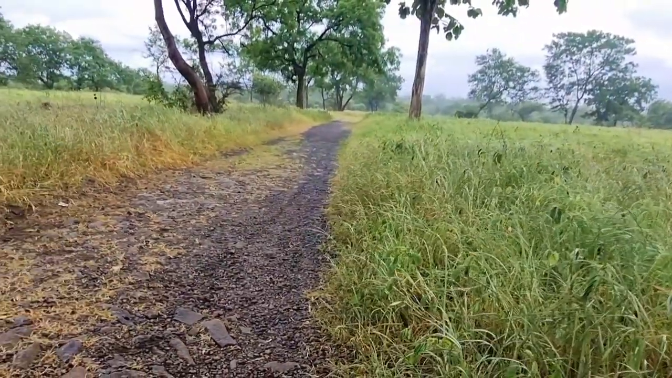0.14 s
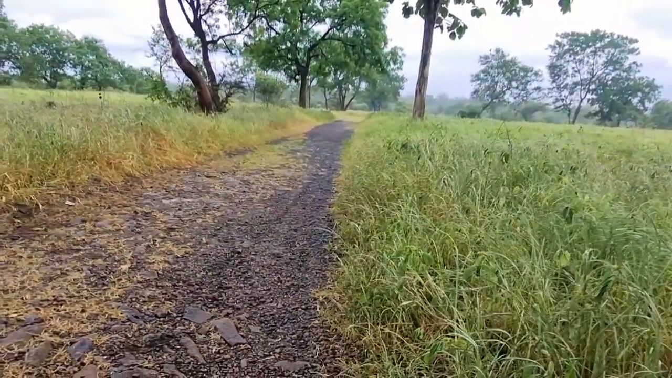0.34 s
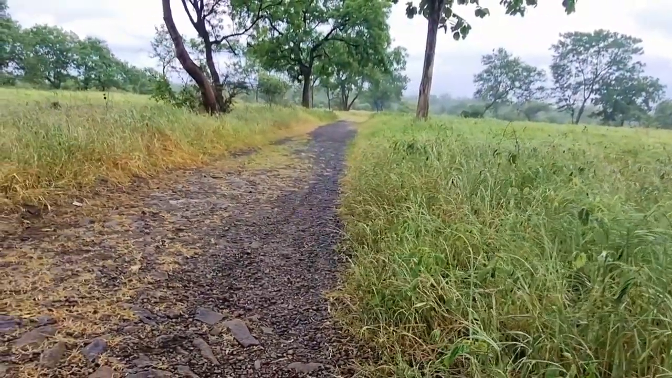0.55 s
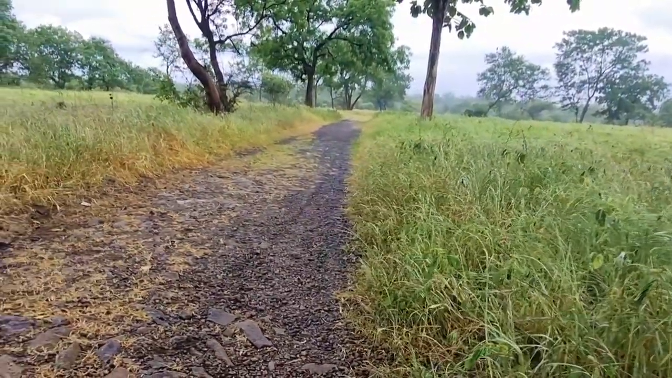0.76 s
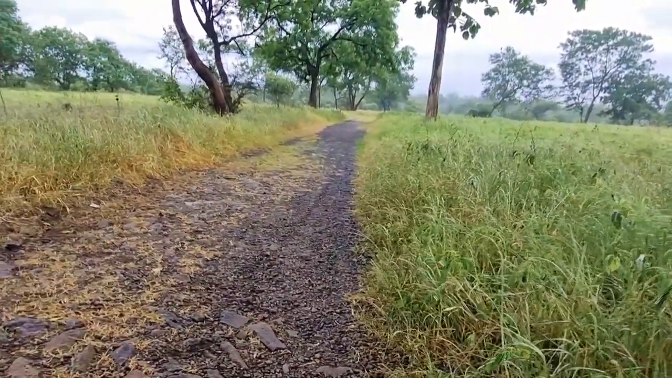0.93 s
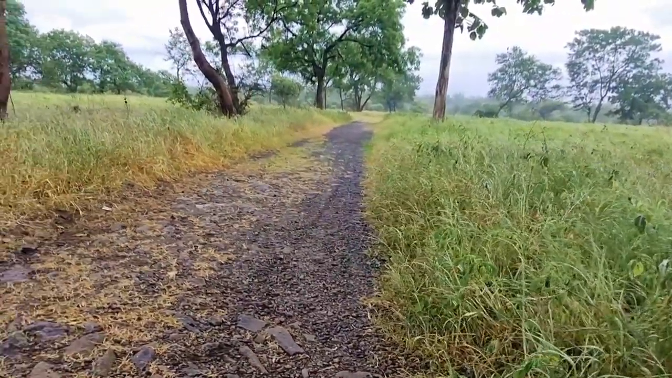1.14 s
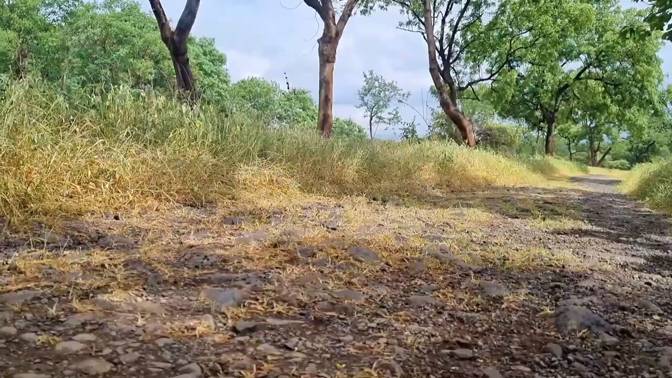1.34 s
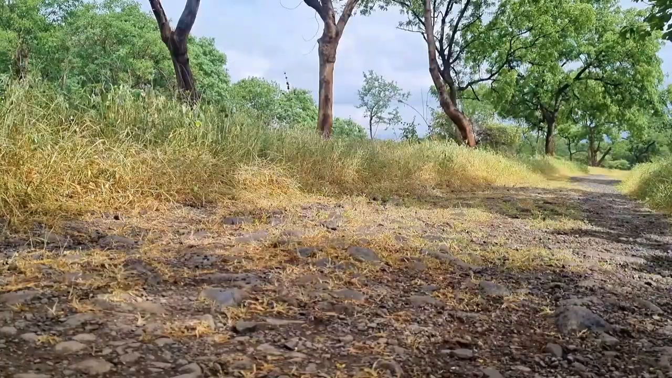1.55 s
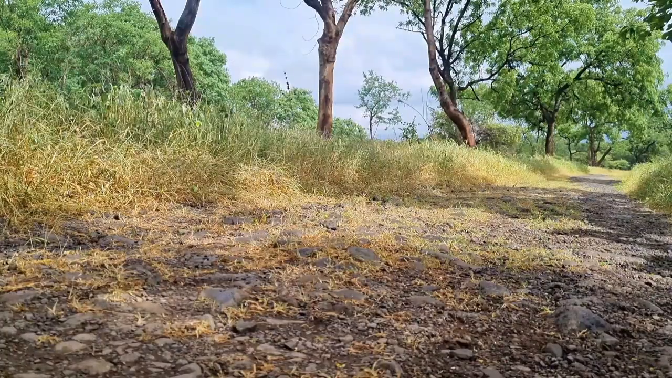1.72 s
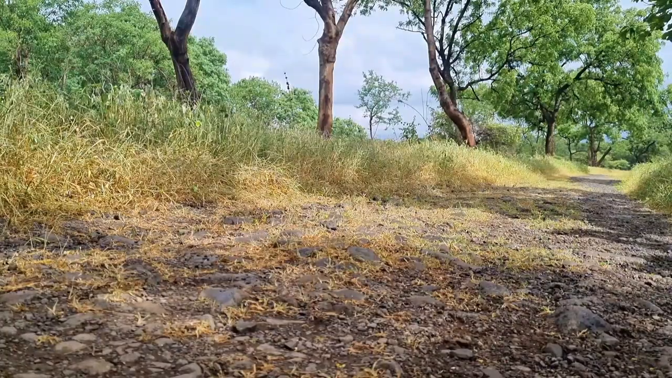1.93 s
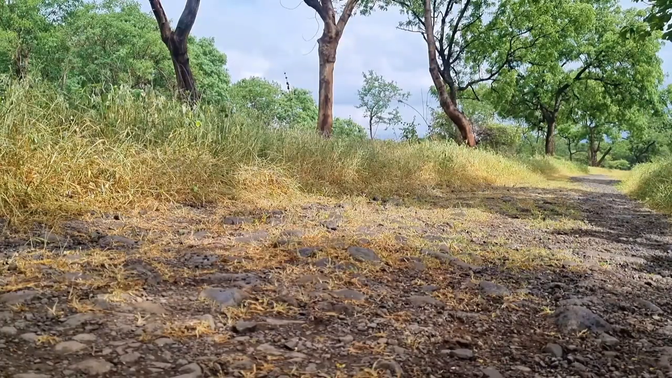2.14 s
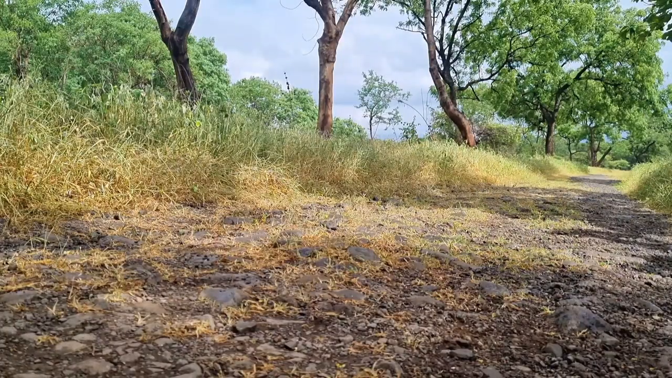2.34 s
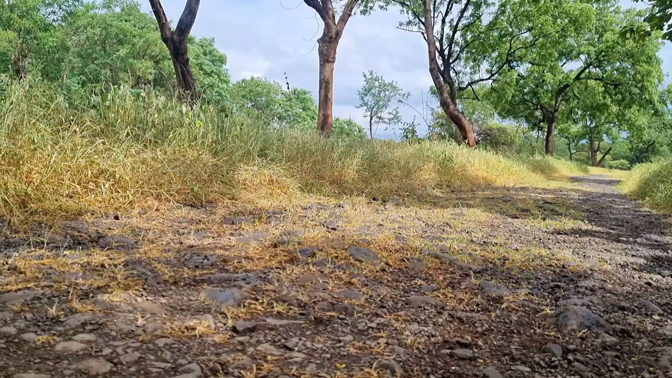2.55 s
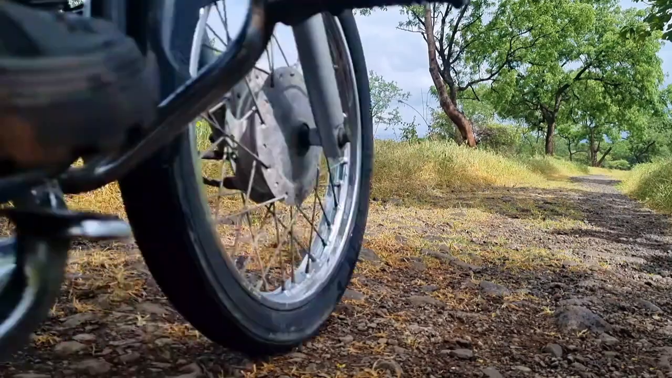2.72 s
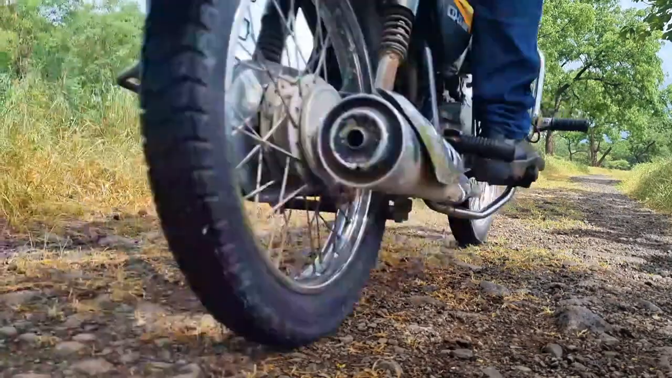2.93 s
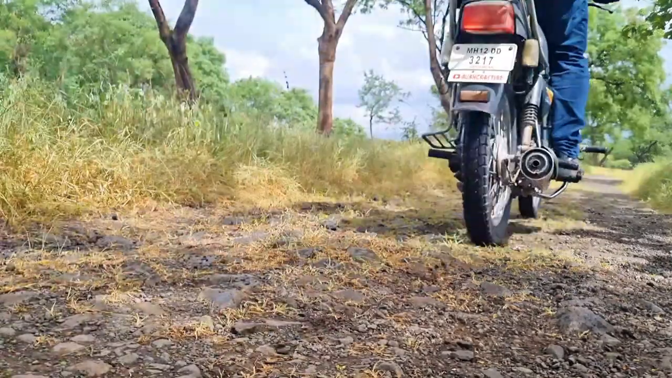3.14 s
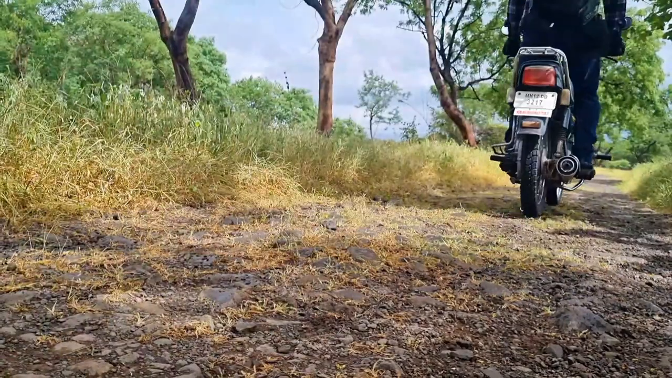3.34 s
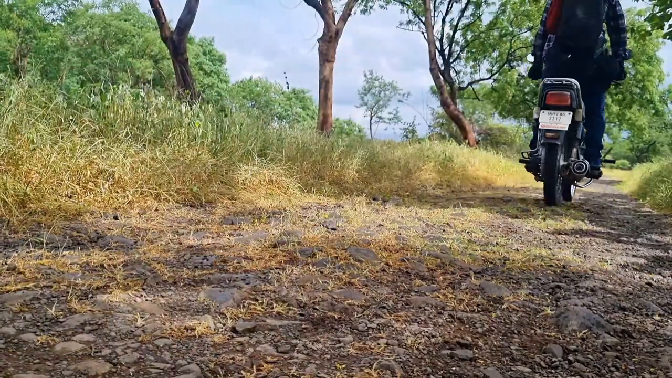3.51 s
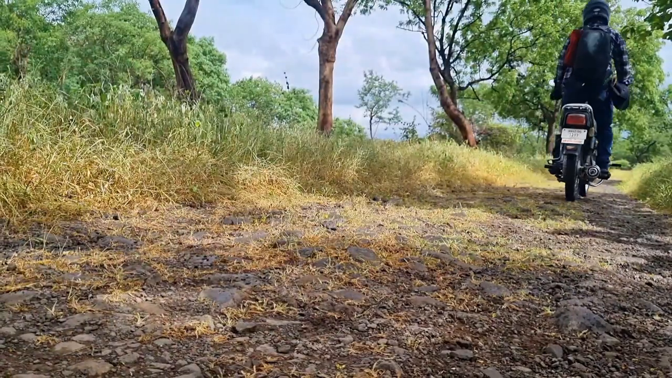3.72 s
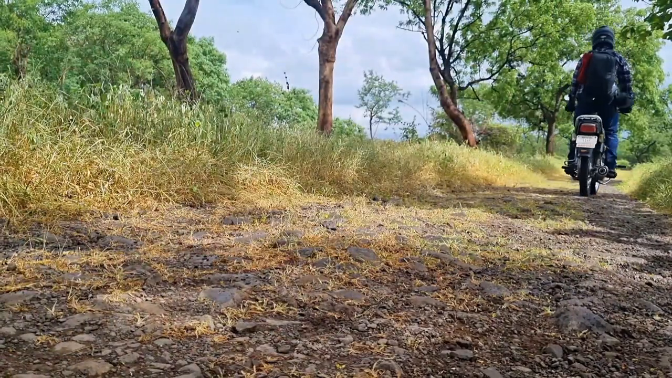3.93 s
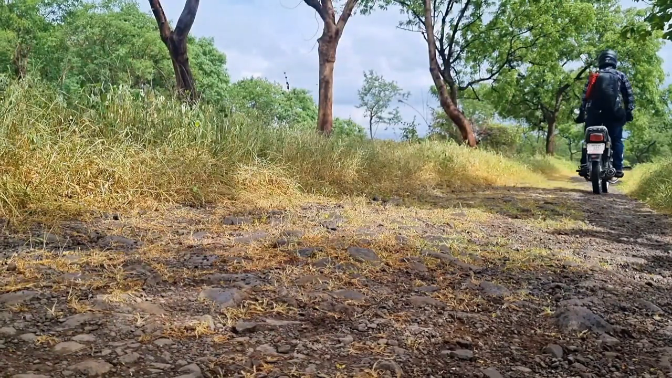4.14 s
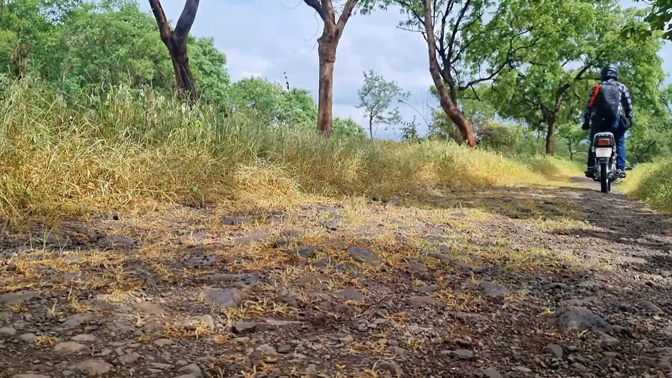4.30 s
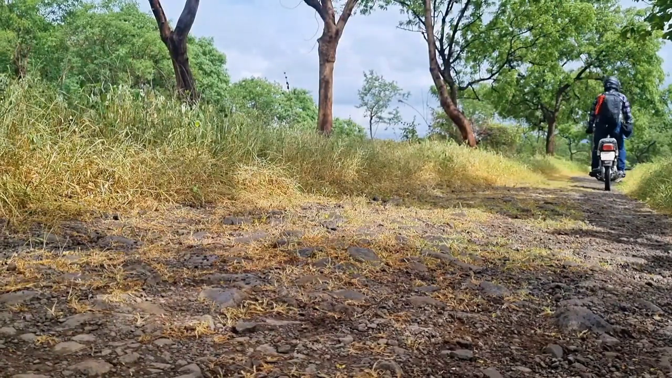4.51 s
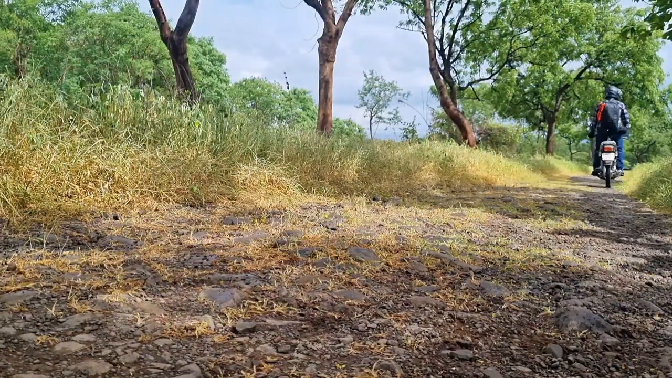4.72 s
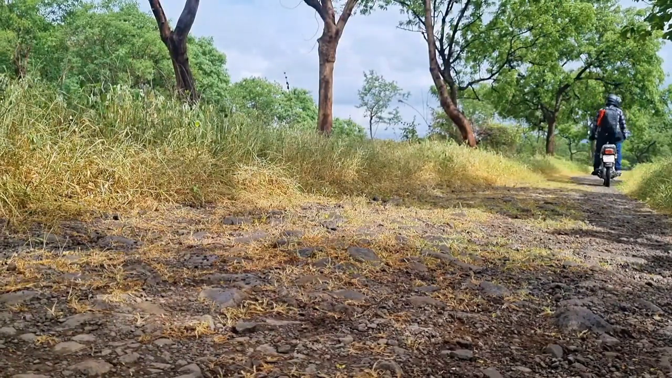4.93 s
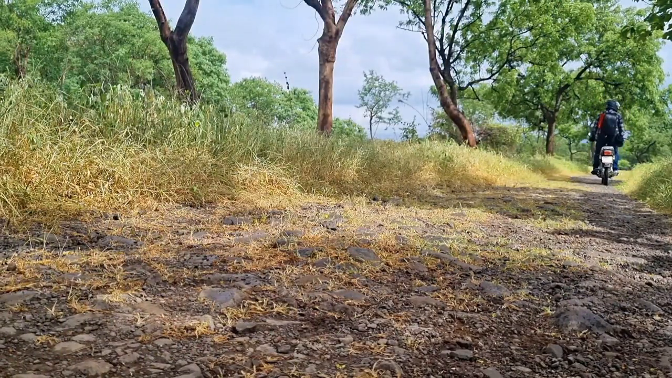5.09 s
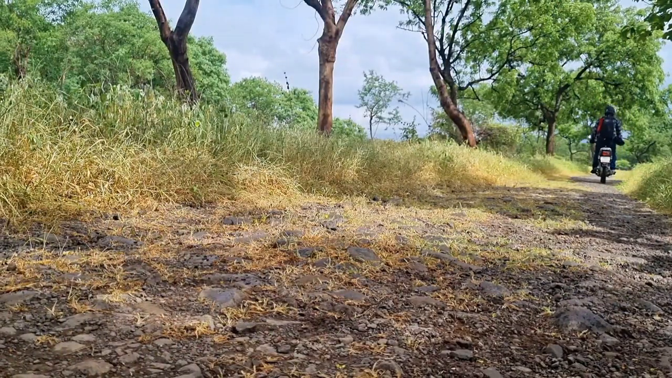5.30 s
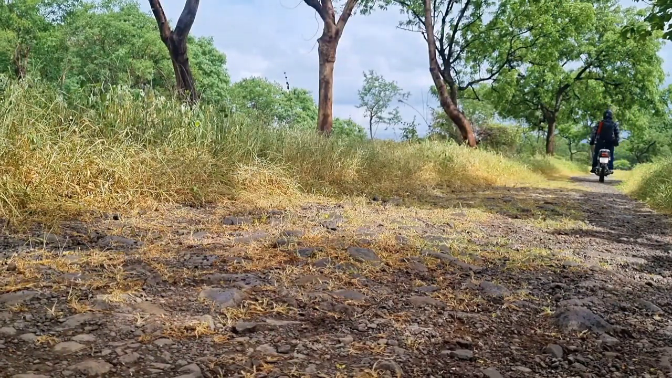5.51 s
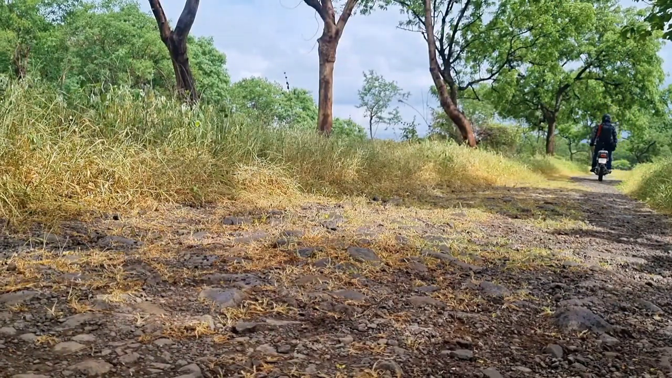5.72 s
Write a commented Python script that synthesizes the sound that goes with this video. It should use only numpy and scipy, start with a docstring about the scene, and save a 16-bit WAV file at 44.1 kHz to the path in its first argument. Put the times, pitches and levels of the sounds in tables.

```python
"""On a stony meadow track, a small single-cylinder motorcycle passes a low microphone pair and rides away.
First come only breeze, small birds and clicks close by. Then each firing rings the silencer's modes,
filtered noise makes the engine and the crunch of gravel, and ringing modes make the metal clank.
Delay and level move the bike between the sides; distance and throttle set how loud it is.
Short noise bursts make the stones, knocks and squeaks; gliding sines make the birds."""
import sys
import numpy as np
from scipy import signal
from scipy.fft import rfft, irfft
from scipy.io import wavfile
from scipy.ndimage import map_coordinates

SR = 44100
rng = np.random.default_rng(int(sys.argv[2]) if len(sys.argv) > 2 else 0)


def digitize_waveform(pressure):
    """Quantize a signal to 16-bit integers and store it at the path in sys.argv[1].

    Rows of a 2-D input are taken as channels; values are limited to [-1, 1].
    """
    field = np.atleast_2d(pressure).T
    bounded = np.clip(field, -1, 1)
    quanta = np.round(bounded * 32767).astype(np.int16)
    wavfile.write(sys.argv[1], SR, quanta)


N = 258426
TIME = np.arange(N) / SR  # seconds


def gain_of(db):
    """Turns decibels into a gain."""
    return 10 ** (np.asarray(db) / 20)


def evened(x):
    """Scales a signal to an rms of 1."""
    return x / np.sqrt(np.mean(x ** 2) + 1e-20)


def curves(rows):
    """Joins the rows of a table with straight lines: one curve through time for each column."""
    s, *columns = np.transpose(rows)
    return [np.interp(TIME, s, column) for column in columns]


def over_frequency(points):
    """Reads a table over frequency at every bin of the whole signal's spectrum."""
    hz, value = np.transpose(points)
    return np.interp(np.log(np.fft.rfftfreq(N, 1 / SR) + 1), np.log(hz), value)


def sides(balance_db):
    """Gains for left and right; a positive balance makes the left louder."""
    return gain_of(np.array([[.5], [-.5]]) * balance_db)


def add(mix, s, sound):
    """Adds a two-channel sound to the mix at time s, cut off where the mix ends."""
    part = mix[:, max(round(s * SR), 0):][:, :sound.shape[1]]
    part += sound[:, :part.shape[1]]


def noise():
    """Two unrelated channels of white noise."""
    return rng.standard_normal((2, N))


def wander(rate_hz):
    """A random drift with an rms of 1; a higher rate makes it move faster."""
    spectrum = rfft(rng.standard_normal(N))
    smoothing = np.exp(-(np.fft.rfftfreq(N, 1 / SR) / rate_hz) ** 2)
    return evened(irfft(spectrum * smoothing, N))


def grains(per_s, spread_db):
    """Sparse tiny impacts of very unequal size, scattered by chance."""
    size = gain_of(spread_db * np.minimum(rng.exponential(1, (2, N)), 4))
    struck = rng.random((2, N)) < per_s / SR
    return evened(noise() * size * struck)


def coloured(pair, spectrum, likeness):
    """Filters two unrelated signals and mixes the first into the second, so the two ports sound partly alike."""
    a, b = rfft(pair)
    same = np.clip(over_frequency(likeness), -1, 1)
    second = same * a + np.sqrt(1 - same ** 2) * b
    return evened(irfft(np.array([a, second]) * gain_of(over_frequency(spectrum)), N))


# Engine speed. Each row: time in seconds, firings a second.
ENGINE_SPEED = [(1.5, 24.8), (1.807, 25.407), (2.266, 24.361), (2.816, 25.241), (3.113, 24.281),
                (4.3, 24.78), (4.41, 25.36), (5.52, 25.13), (5.86, 24.27)]
ONE_FIRING_S = 2.929  # a firing falls at this moment


def engine_cycles():
    """Adds up the engine speed into a running count of cycles; each whole number is a firing."""
    turns = np.cumsum(curves(ENGINE_SPEED)[0]) / SR
    return turns - np.interp(ONE_FIRING_S, TIME, turns)


# The rider coasts past, opens up, then eases off. Each row: time in seconds, throttle from 0 to 1.
THROTTLE = [(4.1, 0), (4.18, .22), (4.45, .55), (5.64, 1), (5.69, .45), (5.86, .62)]
SPEED_M_PER_S = 4.0
SPREAD_DB = 27.8  # lost for each tenfold distance, low over the ground


def passing(nearest_s, distance_m, near_db, ahead_db, throttle_db):
    """Level in dB of a part rolling by in a straight line: it follows distance, facing and throttle."""
    along_m = SPEED_M_PER_S * (TIME - nearest_s)
    range_m = np.hypot(along_m, distance_m)
    spread = SPREAD_DB * np.log10(range_m / distance_m)
    facing = ahead_db * along_m / range_m  # louder while coming, softer while leaving
    return near_db - spread - facing + throttle_db * curves(THROTTLE)[0]


# Silencer modes, the tones at which it rings. Each row: pitch in Hz, relative level in dB,
# time in seconds to die by 60 dB.
SILENCER_MODES = [(49.4, -19, 0.31), (106.2, -1.5, .081), (145.5, 1, 0.051), (280.5, -13, .034),
                  (375, -23.5, 0.017), (610, -57.5, 0.044)]
# How the exhaust goes by. In order: nearest moment in seconds, distance then in metres, base level in dB,
# dB louder ahead of the bike, dB added by full throttle.
EXHAUST_PASS = (2.985, .75, -13.9, 4.0, 10.5)


def exhaust(turns, uneven_db=1.03, blow_hz=1120):
    """Every firing, a little stronger or weaker, rings the silencer; neighbouring modes swing opposite ways."""
    firings = np.diff(np.floor(turns), prepend=np.floor(turns[0]))
    blows = firings * gain_of(uneven_db * wander(35))
    t = TIME[:SR // 2]
    ring = np.zeros(len(t))
    for k, (hz, db, t60) in enumerate(SILENCER_MODES):
        ring += (-1) ** k * gain_of(db - 60 * t / t60) * np.sin(2 * np.pi * hz * t)
    low_pass = signal.butter(2, blow_hz, fs=SR, output="sos")
    thumps = signal.sosfilt(low_pass, signal.fftconvolve(blows, ring)[:N])
    return evened(thumps) * gain_of(passing(*EXHAUST_PASS))


def valve_beat(turns, exhaust_size=0.43, tappet_size=0.65, tappet_place=0.37, length=0.045):
    """Noise swells as the exhaust valve opens and again as a tappet strikes; place and length are in cycles."""
    opening = exhaust_size * np.exp(-(turns % 1) / length)
    tappet = tappet_size * np.exp(-((turns - tappet_place) % 1) / length)
    return evened(1 + opening + tappet)


# Rough patches jolt the bike, so engine, chain and tyres swell.
# Each row: middle in seconds, half length in seconds, swell in dB.
JOLTS = [(2.77, .06, 2.5), (3.27, .035, 3.5), (3.6, .08, 3.5)]


def jolts():
    """Brief swells in dB as the wheels cross rough patches."""
    return sum(db * np.exp(-((TIME - s) / length) ** 2) for s, length, db in JOLTS)


# How alike the two ports hear nearby sound. Each row: frequency in Hz, likeness from 0 to 1.
DIRECT_LIKENESS = [(100, 1), (700, 0.94), (1400, 0.64), (2200, 0.68), (4500, 0.35), (8000, 0.22),
                   (15000, 0.16)]
# Tone colour of the intake. Each row: frequency in Hz, relative level in dB per Hz.
INTAKE_COLOUR = [(130, -7), (230, -4), (290, -0.5), (370, -0.5), (450, -3), (550, -4), (900, -40)]
# How the intake goes by: the same five entries as for the exhaust.
INTAKE_PASS = (2.84, 1.4, -28.7, 3.4, 6.6)


def intake_growl(turns, swell_db, puff_size=0.66, puff_length=0.1):
    """Gas rushes through the intake once a cycle: filtered noise in puffs."""
    puff = evened(1 + puff_size * np.exp(-(turns % 1) / puff_length))
    growl = coloured(noise() * puff, INTAKE_COLOUR, DIRECT_LIKENESS)
    return growl * gain_of(passing(*INTAKE_PASS) + swell_db)


# Tone colour of the engine case. Each row: frequency in Hz, relative level in dB per Hz.
CASE_COLOUR = [(300, -39), (480, -9.5), (570, 2), (630, 1.5), (700, 1.5), (800, -2.5), (900, -3.5),
               (1100, -6), (1400, -13), (2000, -25), (4000, -45)]
# How the engine case goes by: the same five entries as for the exhaust.
CASE_PASS = (2.76, 1.55, -30.5, 3.2, 8.8)


def case_drone(beat, swell_db, flutter_db=1.5):
    """The engine case drones: filtered noise beats with the valves and flutters in level."""
    drone = coloured(noise() * beat, CASE_COLOUR, DIRECT_LIKENESS)
    return drone * gain_of(passing(*CASE_PASS) + swell_db + flutter_db * wander(23))


# Ringing of fins, guards and spokes. Each row: pitch in Hz, relative level in dB,
# time in seconds to die by 60 dB.
METAL_MODES = [(895, 3.5, 0.12), (1235, -5.5, 0.26), (1755, -9, 0.094), (1908, -5, 0.094),
               (2406, -4.5, 0.15), (2588, 2, 0.085), (2710, -1.5, 0.13), (2833, -1, 0.07),
               (2995, -9, 0.096)]


def metal_ringing(drive, scatter_db=1.5):
    """Impacts ring the metal's modes, each at a slightly chance level; a blow of size 1 peaks near 1."""
    t = TIME[:SR // 4]
    ring = np.zeros(len(t))
    for hz, db, t60 in METAL_MODES:
        level_db = db + scatter_db * rng.standard_normal()
        ring += gain_of(level_db - 60 * t / t60) * np.sin(2 * np.pi * hz * t)
    return signal.oaconvolve(drive, ring[None] / abs(ring).max(), axes=1)[:, :N]


# Tone colour of fins and chain. Each row: frequency in Hz, relative level in dB per Hz.
CLATTER_COLOUR = [(500, -7), (900, 1.5), (1250, 4), (1800, 3), (2150, 1), (2700, 0.5), (3100, -4),
                  (3600, -11), (5000, -25), (9000, -21)]
# How fins and chain go by: the same five entries as for the exhaust.
CLATTER_PASS = (2.865, .56, -28.4, 3.9, 8.5)


def clatter(beat, jolt, bumps, noise_db=3.5, metal_db=-4.5, rattle_share=0.62):
    """Fins and chain clatter with the valves: noise and tiny impacts, and impacts that ring the metal."""
    level_db = passing(*CLATTER_PASS) + jolt
    rattle = (noise() + rattle_share * grains(600, 1.7)) * beat
    rattle = coloured(rattle, CLATTER_COLOUR, DIRECT_LIKENESS) * gain_of(level_db + noise_db + bumps)
    ringing = evened(metal_ringing(grains(300, 2.4) * beat)) * gain_of(level_db + metal_db)
    return rattle + ringing


# Loose metal clanks on the stones. Each row: start in seconds, relative level in dB.
CLANKS = [(2.621, -28), (2.658, -26), (2.69, -28), (2.7894, -19), (2.86, -19), (2.9018, -22), (2.989, -35),
          (3.049, -24), (3.0894, -27), (3.2126, -31), (3.261, -26)]


def clanks(level_db=1.0, chatter_s=0.0037):
    """Each clank is a few milliseconds of chatter that sets the metal ringing."""
    blows, t = np.zeros((2, N)), TIME[:SR // 20]
    for s, db in CLANKS:
        chatter = rng.standard_normal((2, len(t))) * np.exp(-t / chatter_s)
        add(blows, s, gain_of(db + level_db) * chatter / np.linalg.norm(chatter[0]))
    return metal_ringing(blows)


# Tone colour of tyres on gravel. Each row: frequency in Hz, relative level in dB per Hz.
GRAVEL_COLOUR = [(1500, -41), (3000, 3.5), (4400, 3.5), (6000, -1), (7000, -1.5), (8300, -0.5), (10000, -5),
                 (12000, -4), (14000, -2.5), (16000, -19)]
# How the tyres go by: the same five entries as for the exhaust.
TYRE_PASS = (2.83, .57, -34.6, 2.1, 4.2)


def tyres(jolt, bumps, level_db=5.0, crunch_share=0.56, patch_db=0.94, jolt_share=.55):
    """Tyres crunch over gravel: filtered noise and tiny impacts that come and go with the ground."""
    crunch = coloured(noise() + crunch_share * grains(1500, 3.6), GRAVEL_COLOUR, DIRECT_LIKENESS)
    ground_db = jolt_share * jolt + bumps + patch_db * wander(22)
    return crunch * gain_of(passing(*TYRE_PASS) + level_db + ground_db)


# Where the bike is heard. Each row: time in seconds, milliseconds by which sound reaches the left port late,
# left minus right in dB.
BEARING = [(1.5, -0.24, 2), (2.4, -0.31, 1.5), (2.65, -0.39, 1.5), (2.9, -0.34, 3), (3.02, -0.046, 1),
           (3.2, 0.115, 1), (3.7, 0.17, 0.5), (5.8, 0.17, 1.6)]
ENTRY_S, ENTRY_RISE_S = 1.495, 0.115  # the motorcycle sound sets in here, rising within about a tenth of a second


def motorcycle(bump_db=1.22, engine_jolt=.9):
    """Exhaust, engine and tyres together, placed by a moving delay and level between the ports."""
    turns = engine_cycles()
    beat = valve_beat(turns)
    jolt = jolts()
    bumps = bump_db * wander(33)  # dB; the rough ground shakes the chain and loads the tyres
    sound = intake_growl(turns, engine_jolt * jolt + bumps)
    sound += case_drone(beat, engine_jolt * jolt)
    sound += clatter(beat, jolt, bumps) + clanks()
    sound += tyres(jolt, bumps)
    sound += exhaust(turns)
    late_ms, balance_db = curves(BEARING)
    read_at = np.arange(N) - late_ms * SR / 1000
    left = map_coordinates(sound[0], [read_at], order=5, mode="nearest")
    entry = np.clip((TIME - ENTRY_S) / ENTRY_RISE_S, 0, 1)
    return np.array([left, sound[1]]) * sides(balance_db) * entry


def taps(rows, octaves, level_db, snap):
    """Short impacts: a bright snap, then a burst of noise about a centre frequency that dies away."""
    out, t = np.zeros((2, N)), TIME[:SR // 5]
    hz = np.fft.rfftfreq(len(t), 1 / SR) + 1
    for s, db, centre_hz, t60, balance_db in rows:
        shared, *own = rng.standard_normal((3, len(t)))
        white = evened(shared + 1.24 * np.array(own))
        band = 1 / (1 + (np.log2(hz / centre_hz) / octaves) ** 4)
        burst = evened(irfft(rfft(white) * band, len(t)))
        tap = burst * gain_of(-60 * t / t60) + snap * white * np.exp(-t / 0.00091)
        add(out, s, tap * gain_of(db + level_db) * sides(balance_db))
    return out


# The frame knocks over bumps. Each row: start in seconds, relative level in dB, centre in Hz,
# time in seconds to die by 60 dB, left minus right in dB.
KNOCKS = [(1.664, -27.5, 700, 0.031, 13), (1.704, -37, 616, 0.045, 12), (1.888, -30, 750, .04, 3),
          (2.079, -30, 676, 0.044, -3), (2.566, -21.5, 380, 0.049, 3.5), (2.621, -22, 1900, .05, 5),
          (2.658, -19, 2000, 0.024, 6), (2.725, -22, 600, .05, 3), (2.789, -21.5, 1110, 0.033, 7)]


def frame_knocks():
    """The frame knocks: broad bursts with little snap."""
    return taps(KNOCKS, octaves=0.71, level_db=-1, snap=.15)


# Stones spat from under the tyres. Each row: start in seconds, relative level in dB, centre in Hz,
# time in seconds to die by 60 dB, left minus right in dB.
STONES = [(1.7032, -41, 3240, 0.08, 1.5), (2.5367, -32, 3030, 0.12, 1.5), (2.7407, -20.5, 3670, 0.08, 8),
          (3.272, -31, 6740, 0.19, -3), (3.7489, -40, 7200, 0.18, -6), (4.5825, -43.5, 9890, 0.058, -9)]


def spat_stones():
    """Stones strike brightly: broad high bursts."""
    return taps(STONES, octaves=1.0, level_db=-8, snap=.3)


# Thin metallic squeaks from the moving bike. Each row: start in seconds, relative level in dB, centre in Hz,
# time in seconds to die by 60 dB, left minus right in dB.
SQUEAKS = [(2.128, -32.5, 4350, 0.11, 4), (2.131, -36.5, 8400, 0.17, 0), (2.133, -39, 11500, .07, 1),
           (3.376, -38.5, 4480, .09, -3)]


def squeaks():
    """Very narrow bands of noise squeak almost like tones."""
    return taps(SQUEAKS, octaves=.13, level_db=-6.5, snap=.3)


# Small clicks in the grass close by. Each row: start in seconds, relative level in dB, centre in Hz.
CLICKS = [(0.063, -37, 3750), (0.09, -34, 850), (0.162, -37.5, 850), (0.214, -42.5, 8130),
          (0.266, -43, 690), (0.369, -37.5, 700), (0.457, -42.5, 2620), (0.535, -45, 5610),
          (0.6, -42, 1330), (0.615, -36.5, 1120), (0.741, -42.5, 1140), (1.251, -37.5, 750),
          (1.371, -38, 7950)]
CLICK_T60_S, CLICK_BALANCE_DB = .052, 3.0
# weaker ones fall at random in this stretch of seconds
FAINT_CLICKS_S, FAINT_CLICK_DB, FAINT_CLICK_HZ = (.25, 1.2), -45.5, 950


def grass_clicks(count=3):
    """The clear clicks and a few faint ones, all equally short and a little to the left."""
    faint = [(s, FAINT_CLICK_DB, FAINT_CLICK_HZ) for s in rng.uniform(*FAINT_CLICKS_S, count)]
    rows = [(s, db, hz, CLICK_T60_S, CLICK_BALANCE_DB) for s, db, hz in CLICKS + faint]
    return taps(rows, octaves=1.14, level_db=-6.5, snap=0.57)


# a faint warble runs between these seconds; its level is relative
WARBLE_S, WARBLE_DB, WARBLE_HZ = (.18, 1.28), -68, 4050
NOTE_S, NOTE_SPREAD_OCTAVES, NOTE_GLIDE_OCTAVES = .04, .3, .24


def warble(count=11):
    """A loose run of short notes of chance pitch, rising and falling by turns."""
    notes = []
    chances = rng.standard_normal((count, 2))
    for k, (s, (shift, pitch)) in enumerate(zip(np.linspace(*WARBLE_S, count), chances)):
        hz = WARBLE_HZ * 2 ** (NOTE_SPREAD_OCTAVES * pitch)
        glide = 2 ** ((-1) ** k * NOTE_GLIDE_OCTAVES / 2)
        notes.append((abs(s + shift * NOTE_S / 2), NOTE_S, hz / glide, hz * glide, WARBLE_DB))
    return notes


def foliage(sound, t60=0.12, wet=0.48):
    """Leaves and trunks scatter a distant call into a short tail of fading noise."""
    t = TIME[:SR // 4]
    tail = rng.standard_normal((2, len(t))) * gain_of(-60 * t / t60)
    return sound + wet * signal.oaconvolve(sound, tail / np.linalg.norm(tail[0]), axes=1)[:, :N]


# The clearest bird notes. Each row: start in seconds, length in seconds, first pitch in Hz,
# last pitch in Hz, relative level in dB.
BIRD_NOTES = [(0.103, 0.054, 3600, 4750, -62), (0.23, .05, 3050, 3450, -64),
              (0.303, 0.077, 2850, 3850, -64), (.428, .022, 7600, 6800, -59),
              (1.038, 0.038, 4100, 3350, -63), (1.08, .035, 4750, 5450, -63),
              (1.316, 0.048, 4450, 3450, -62), (1.345, .02, 7700, 6900, -57),
              (1.351, 0.028, 3400, 4000, -55), (5.342, 0.085, 2500, 2750, -58.5),
              (5.639, 0.077, 2450, 2800, -54.5)]


def birds(level_db=-3.5, waver=.015):
    """Thin gliding whistles from the trees: sines whose pitch slides and wavers."""
    out, shake = np.zeros((2, N)), 1 + waver * wander(150)
    for s, length, start_hz, end_hz, db in BIRD_NOTES + warble():
        n = max(int(length * SR), 2)
        hz = np.linspace(start_hz, end_hz, n) * shake[int(s * SR):][:n]
        phase = 2 * np.pi * (np.cumsum(hz) / SR + rng.random((2, 1)) / 2)
        add(out, s, gain_of(db + level_db) * np.hanning(n) * 2 * np.sin(phase))
    return foliage(out)


# How alike the two ports hear sound from all around. Each row: frequency in Hz, likeness from 0 to 1.
DIFFUSE_LIKENESS = [(100, 0.92), (350, 0.82), (700, 0.25), (1400, 0.033), (15000, 0.038)]
# Tone colour of dry grass. Each row: frequency in Hz, relative level in dB per Hz.
GRASS_COLOUR = [(2500, -7), (4500, -1), (7000, -6), (9000, -2), (9700, 2), (10500, -4), (12000, -3),
                (14200, -2), (16000, 1)]
# Tall grass hissing in the breeze. Each row: time in seconds, base level in dB.
RUSTLE = [(1.48, -90), (1.6, -60), (4.3, -64), (4.42, -53.5), (4.7, -58), (4.95, -52.5), (5.35, -59),
          (5.55, -62), (5.86, -66)]


def grass(balance_db=-10.0, tick_share=0.9, sway_db=1.8):
    """Dry stems brush together in uneven strokes of hiss and ticks, mostly on the right."""
    hiss = coloured(noise() + tick_share * grains(900, 4.6), GRASS_COLOUR, DIFFUSE_LIKENESS)
    return hiss * gain_of(curves(RUSTLE)[0] + sway_db * wander(20)) * sides(balance_db)


# Single buffets of air on the microphone. Each row: start in seconds, level in dB, pitch in Hz,
# left minus right in dB.
BUFFETS = [(.245, -34, 83.5, 4), (0.959, -35, 71.5, 2), (1.593, -23.5, 78, 1), (4.135, -31, 68, 15),
           (4.463, -29, 53, 14.5), (4.524, -32.5, 54.4, 19), (4.615, -31, 50.4, 8), (4.705, -33, 54, 17),
           (4.855, -30.5, 58.4, 12)]


def buffets(swings=2.65):
    """Eddies push the diaphragm to and fro for a few swings."""
    out = np.zeros((2, N))
    for s, db, hz, balance_db in BUFFETS:
        t = TIME[:int(swings / hz * SR)]
        push = np.hanning(len(t)) * np.sin(2 * np.pi * (hz * t + rng.random()))
        add(out, s, gain_of(db) * push * sides(balance_db))
    return out


# Tone colour of the breeze. Each row: frequency in Hz, relative level in dB per Hz.
BREEZE_COLOUR = [(20, -30), (40, -20), (60, 0.5), (85, 0.5), (130, -4.5), (200, -16), (400, -25),
                 (1000, -50)]
# Breeze on the microphone. Each row: time in seconds, level in dB, left minus right in dB.
BREEZE_LEVEL = [(0, -49, 2), (1.48, -48, 1), (1.6, -38, 1), (4.0, -43.5, 4), (4.55, -42, 8),
                (5.0, -43.5, 8), (5.4, -42.5, 2)]


def breeze(lumps_db=2.7):
    """A lumpy breeze on the microphone: deep noise that swells unevenly."""
    wind_db, balance_db = curves(BREEZE_LEVEL)
    lumpy = noise() * gain_of(lumps_db * wander(17))
    return coloured(lumpy, BREEZE_COLOUR, DIFFUSE_LIKENESS) * gain_of(wind_db) * sides(balance_db)


# Tone colour of the meadow. Each row: frequency in Hz, relative level in dB per Hz.
MEADOW_COLOUR = [(30, -15), (60, -1), (100, -7.5), (200, -19), (300, -26), (480, -27), (1000, -26),
                 (1700, -27), (3000, -28.5), (6000, -33.5), (7500, -34), (8400, -31), (9300, -38),
                 (15500, -37)]


def meadow(level_db=-52):
    """A steady hush of grass and insects: filtered noise."""
    return coloured(noise(), MEADOW_COLOUR, DIFFUSE_LIKENESS) * gain_of(level_db)


def scene():
    """All sources together, from the motorcycle to the background."""
    bike = motorcycle() + frame_knocks() + spat_stones() + squeaks()
    nearby = grass_clicks() + birds()
    return bike + nearby + grass() + buffets() + breeze() + meadow()


def record(dry, roll_off_hz=28, edge_hz=15800):
    """The small microphones lose the deepest bass; then a low-pass filter limits the treble."""
    high_pass = signal.butter(2, roll_off_hz, "highpass", fs=SR, output="sos")
    thinned = signal.sosfilt(high_pass, dry)
    low_pass = signal.firwin(511, edge_hz, window=("kaiser", 9), fs=SR)
    return signal.oaconvolve(thinned, low_pass[None], "same")


dry = scene()
out = record(dry)
digitize_waveform(out)
```